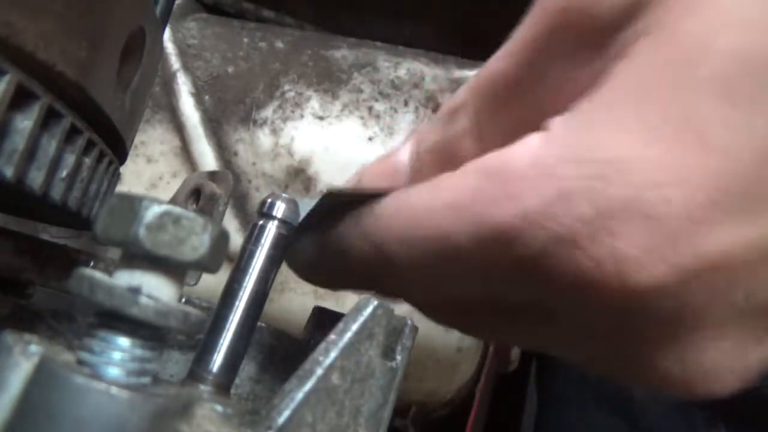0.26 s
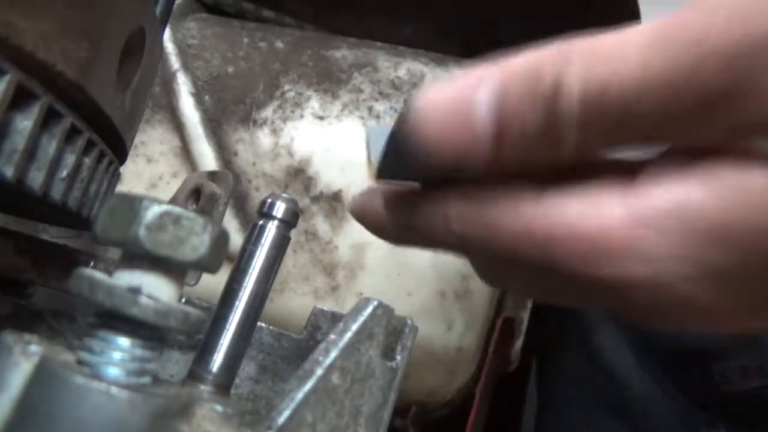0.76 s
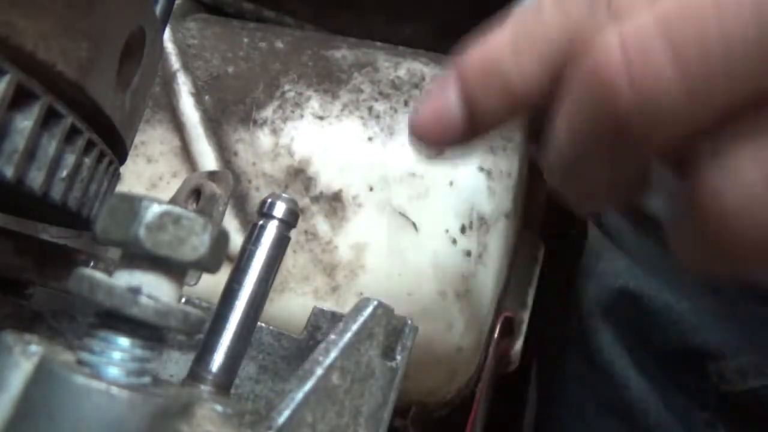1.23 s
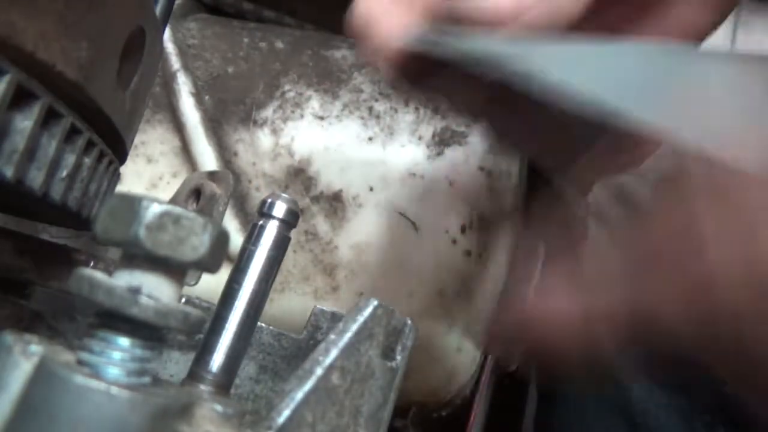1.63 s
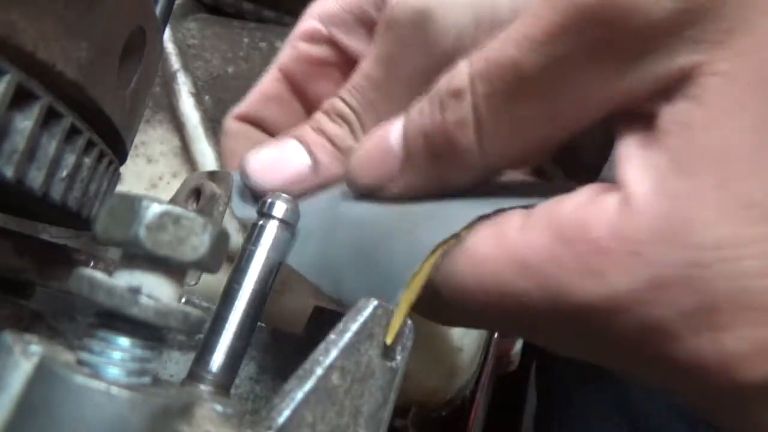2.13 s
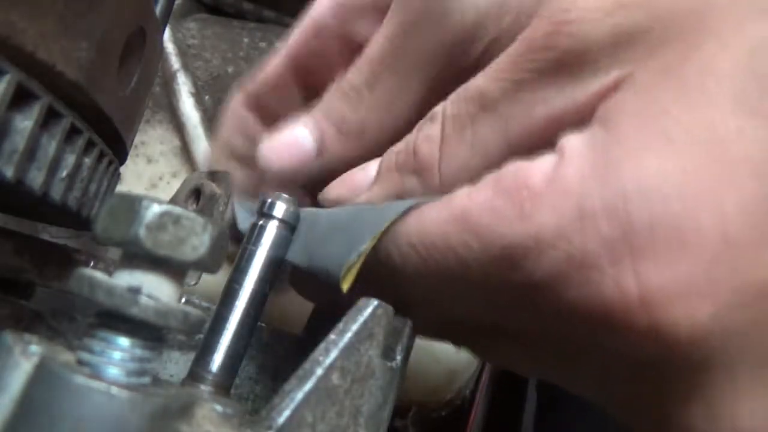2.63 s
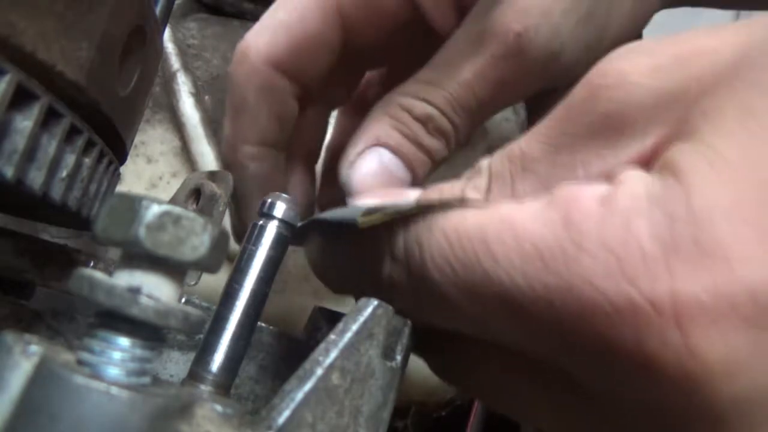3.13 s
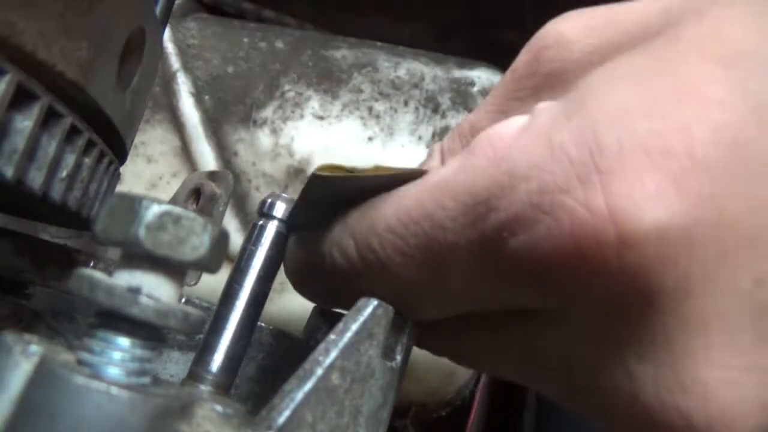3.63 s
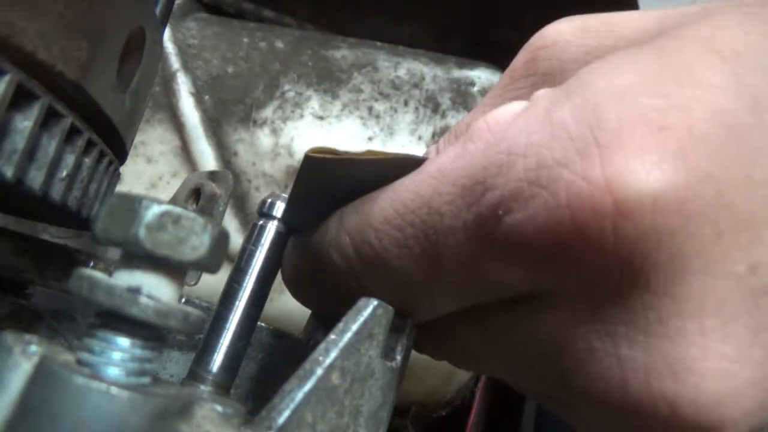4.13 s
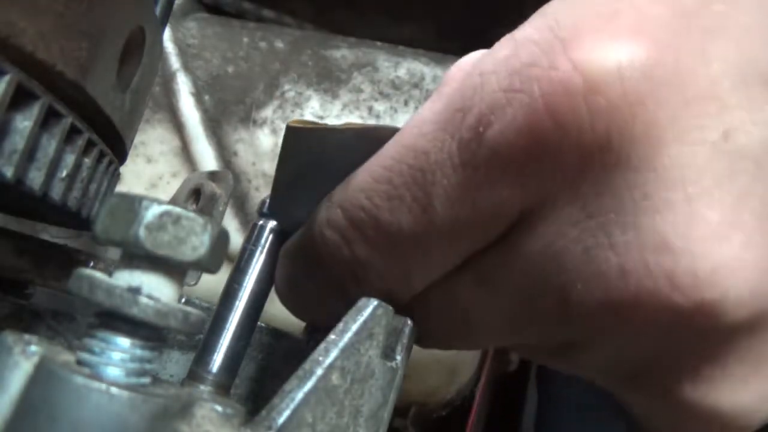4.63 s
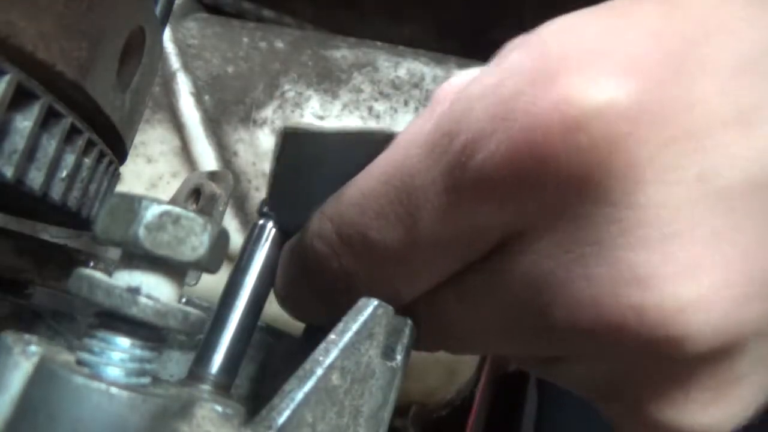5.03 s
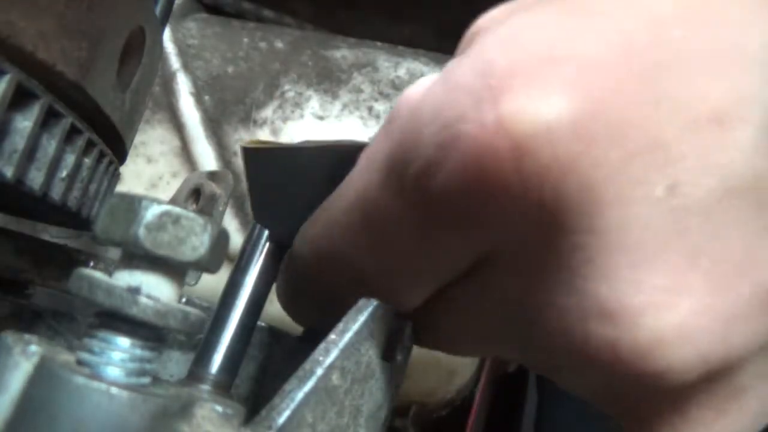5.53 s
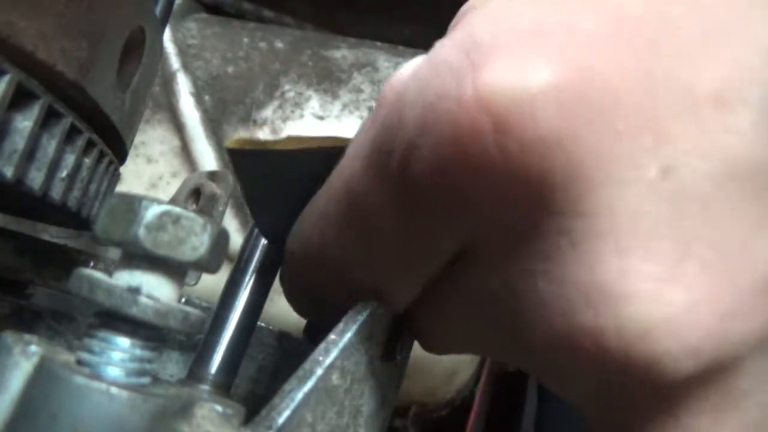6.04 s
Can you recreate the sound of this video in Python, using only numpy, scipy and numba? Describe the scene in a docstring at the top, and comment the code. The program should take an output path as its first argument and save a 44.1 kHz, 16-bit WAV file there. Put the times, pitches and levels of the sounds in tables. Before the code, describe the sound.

Close by in a quiet workshop, hands fold a strip of sandpaper and fit it around a steel shaft, making uneven hissing scrapes and crackles. Sharp taps thud in a hollow bench, and the shaft rings softly where it is rubbed. Near the end a geared motor clacks on, rattles for under a second with the paper hissing on the spinning steel, then runs down, leaving a fading metallic ring.

```python
"""Sandpaper hisses and crackles as hands fold a strip and fit it round a steel shaft, close by in a workshop.
Catching grit sounds through the paper and the fingers, taps thud in a hollow bench, and the shaft rings
where it is rubbed. Near 5 s a geared motor clacks in, spins the shaft against the paper, rattles down
and leaves a steel part ringing. Quiet room air and a faint insect lie underneath."""
import sys
import numpy as np
from scipy import signal
from scipy.fft import rfft, irfft
from scipy.io import wavfile
from scipy.ndimage import uniform_filter1d
from numba import njit

SR = 44100
rng = np.random.default_rng(int(sys.argv[2]) if len(sys.argv) > 2 else 0)


def persist_wave(psi):
    """Save psi, clipped to +-1, as 16-bit WAV."""
    counts = np.round(np.clip(psi, -1, 1) * 32767).astype(np.int16)
    wavfile.write(sys.argv[1], SR, np.atleast_2d(counts).T)


N = 276948
T = np.arange(N) / SR
FFT_SIZE = 4096
BIN_HZ = np.maximum(np.arange(FFT_SIZE // 2 + 1) * SR / FFT_SIZE, 1)
LN_1000 = np.log(1000)  # 60 dB of decay
MOTOR_ON_S, MOTOR_OFF_S = 4.957, 5.777

# grit hiss spectrum: (frequency [Hz], density [dB])
GRIT_SPECTRUM = [(3000, -20), (5500, -11), (8300, -3), (9900, -1.5), (11400, -11), (14700, -30.5)]
# hollow bench: (frequency [Hz], level [dB], t60 [s])
BENCH_MODES = [(221.4, 4, 0.15), (329, 5, 0.045), (644, 8, 0.012), (1260, 4.5, 0.026)]


def undb(db):
    """Decibels to gain."""
    return 10 ** (np.asarray(db) / 20)


def unit(x):
    """Scale to rms 1."""
    return x / np.sqrt(np.mean(x ** 2))


def walk(rate_hz):
    """Slewed random levels, spread near 1."""
    hold = int(SR / rate_hz)
    return uniform_filter1d(np.repeat(rng.standard_normal(N // hold + 1), hold), hold)[:N]


def on_bins(points):
    """Interpolate (Hz, value) points onto BIN_HZ in log frequency."""
    hz, value = np.transpose(points)
    return np.interp(np.log(BIN_HZ), np.log(hz), value)


def filtered(x, response):
    """Convolve with a response given on BIN_HZ."""
    return signal.oaconvolve(np.atleast_2d(x), np.atleast_2d(irfft(response, FFT_SIZE)), axes=1)


def colour(x, spectrum):
    """Minimum-phase filter from (Hz, dB) points; mean power gain 1."""
    cepstrum = irfft(np.log(unit(undb(on_bins(spectrum)))), FFT_SIZE)
    cepstrum[1:FFT_SIZE // 2] *= 2
    cepstrum[FFT_SIZE // 2:] = 0
    return filtered(x, np.exp(rfft(cepstrum)))[:, :N].reshape(x.shape)


def resonance(x, hz, width_hz):
    """Band-pass, gain 1 at the centre, Q at least 0.6."""
    return signal.lfilter(*signal.iirpeak(hz, max(hz / width_hz, .6), SR), x)


@njit
def glide(x, hz, relative_width):
    """State-variable band-pass with a moving centre."""
    out, band_state, low_state = np.empty(len(x)), 0., 0.
    for i in range(len(x)):
        g = np.tan(np.pi * hz[i] / SR)
        band = (band_state + g * (x[i] - low_state)) / (1 + g * (g + relative_width))
        band_state = 2 * band - band_state
        low_state += 2 * g * band
        out[i] = relative_width * band
    return out


def ring(x, modes):
    """Damped modes; white noise of rms 1 gives each its listed level."""
    out = 0
    for hz, db, t60_s in modes:
        pole = np.exp(2j * np.pi * hz / SR - LN_1000 / (t60_s * SR))
        mode = signal.lfilter([0, pole.imag], [1, -2 * pole.real, abs(pole) ** 2], x)
        out += undb(db) * np.sqrt(2 * (1 - abs(pole) ** 2)) * mode
    return out


def swells(peak_s, peak_db, rise_s, fall_s):
    """Level [dB] of the loudest event at each moment; rise and fall times span 20 dB."""
    level_db = np.full(N, -200.)
    for at, top_db, rise, fall in np.broadcast(peak_s, peak_db, rise_s, fall_s):
        level_db = np.maximum(level_db, top_db - 20 * np.maximum((at - T) / rise, (T - at) / fall))
    return level_db


def grains(spread_db, patch_db, patch_hz):
    """Dense tiny impacts: most small, a few large, in patches."""
    size = np.minimum(rng.exponential(size=N), 5)
    return unit(undb(spread_db * size + patch_db * walk(patch_hz)) * rng.standard_normal(N))


def air():
    """Workshop air, swelling a little; its treble is alike left and right."""
    # (frequency [Hz], density [dB])
    air_spectrum = [(30, -18), (260, 7), (700, 8), (1500, 2), (3200, 0), (4500, -6), (10000, 0.5),
                    (15000, -20.5)]
    mid, side = colour(rng.standard_normal((2, N)), air_spectrum) * undb(5.2 * walk(5.83))
    side = 0.95 * resonance(side, 1700, 3000)
    return undb(-61) * np.array([mid + side, mid - side])


def insect(pitch_hz=3300, pulse_hz=26):
    """Faint chirr: pulses of narrow-band noise."""
    pulses = np.maximum(np.sin(2 * np.pi * pulse_hz * T), 0) ** 6
    gain = undb(-59 - walk(3) ** 2)
    return gain * pulses * unit(resonance(rng.standard_normal(N), pitch_hz, 290))


def stroke_level_db(pause_db=-17, edge_s=0.0023):
    """Hand strokes on the strip, hushed while it is held still."""
    # (peak time [s], level [dB], 20 dB rise [s], 20 dB fall [s])
    strokes = [(0.066, -51, 0.22, 0.028), (0.37, -32.5, 0.12, 0.045), (0.5, -35.5, 0.16, 0.07),
               (0.785, -39, 0.13, 0.087), (0.828, -35.5, .02, 0.075), (0.912, -43.5, 0.16, 0.26),
               (1.064, -48.5, 0.1, 0.25), (1.2, -44, 0.043, 0.094), (1.312, -52, .012, 0.71),
               (1.446, -33.5, 0.011, 0.02), (1.544, -31, 0.12, 0.12), (1.76, -34.5, 0.16, 0.31),
               (1.825, -34, 0.091, .075), (1.881, -28, 0.002, 0.13), (1.973, -36, 0.026, 0.026),
               (2.147, -35.5, 0.29, 0.38), (2.26, -43.5, 0.13, 0.044), (2.458, -28, 0.035, 0.04),
               (2.609, -35.5, 0.16, 0.21), (2.799, -26.5, 0.11, 0.036), (2.865, -32, 0.016, 0.029),
               (2.916, -35, 0.033, 0.41), (3.062, -23.5, 0.18, 0.063), (3.136, -31, 0.009, 0.015),
               (3.185, -30.5, 0.011, 0.091), (3.214, -23, 0.055, 0.14), (3.28, -31, .05, 0.21),
               (3.358, -33.5, 0.054, .041), (3.45, -43.5, 0.058, 0.22), (3.85, -32, 0.0051, 0.085),
               (4.148, -53.5, 0.084, 0.069), (4.231, -41.5, 0.025, 0.033), (4.349, -45.5, 0.02, 0.02),
               (4.445, -46, 0.082, 0.17)]
    # strip held still: (start [s], length [s])
    pauses = [(0.077, 0.11), (0.567, 0.1), (1.121, 0.034), (1.255, 0.052), (1.623, 0.072), (1.941, 0.016),
              (1.993, 0.023), (3.087, 0.026), (3.152, 0.017), (3.477, 0.049)]
    still = sum((T > start_s) & (T < start_s + length_s) for start_s, length_s in pauses)
    return swells(*np.transpose(strokes)) + pause_db * uniform_filter1d(1. * still, int(edge_s * SR))


def flex_hz(paper_hz, rate_hz):
    """Pitch of a patch of the sheet, jumping each time the bend changes."""
    hold = int(SR / rate_hz)
    jumps = np.repeat(rng.standard_normal(N // hold + 1), hold)[:N]
    return np.clip(1.3 * paper_hz * undb(4 * jumps), 1500, 12000)


def sandpaper(whistle_hz=9470):
    """Catching grit sounds as hiss, through the bending paper and through the fingers."""
    # grip, for a -40 dB stroke: (time [s], paper level [dB], paper pitch [Hz], finger rumble [dB])
    grip = [(0, -43.5, 5700, -86), (.75, -42.5, 3840, -58.5), (1.0, -37, 3130, -42.5),
            (1.2, -35.5, 4200, -49.5), (1.55, -41.5, 4700, -51.5), (1.85, -52, 5370, -79),
            (2.1, -35.5, 5320, -47.5), (3.0, -49, 4800, -52), (3.3, -51, 4430, -55.5),
            (3.9, -30, 2480, -35.5), (4.23, -31.5, 1880, -48.5), (4.76, -43.5, 3220, -42)]
    # (frequency [Hz], density [dB])
    finger_spectrum = [(100, -20), (450, 3.5), (1100, 5), (1900, 16.5), (3000, -27)]
    time_s, *columns = np.transpose(grip)
    paper_db, paper_hz, finger_db = (np.interp(T, time_s, column) for column in columns)
    paper_db[T > time_s[-1]] = -200
    stroke_db = stroke_level_db()
    effort_db = stroke_db + 40
    catches = grains(spread_db=3, patch_db=2.5, patch_hz=90)
    patches = sum(glide(catches, flex_hz(paper_hz, rate_hz), 0.08) for rate_hz in (12, 25))
    paper = undb(paper_db + 0.83 * effort_db) * unit(glide(catches, paper_hz, 0.95) + 1.55 * patches)
    # fast grit on the taut strip: hard strokes gather into one bright band
    bright_band = unit(glide(catches, whistle_hz * undb(.5 * walk(27.48)), 0.13))
    whistle = undb(-10.5 + 1.29 * effort_db) * bright_band
    hiss = undb(stroke_db - 6) * (colour(catches, GRIT_SPECTRUM) + whistle)
    rumble = colour(undb(finger_db + 0.72 * effort_db) * catches, finger_spectrum)
    bench_boom = 2.1 * resonance(rumble, BENCH_MODES[0][0], 21)
    return hiss + paper + rumble + bench_boom


def taps():
    """Snaps, taps and the motor's clack: a sharp pitched crack with the bench ringing under it."""
    # (time [s], crack peak [dB], crack pitch [Hz], thud re crack [dB], thud pitch [Hz], crack t60 [s])
    hits = [(0.8032, -20.5, 2390, -10.5, 400, 0.011), (1.707, -24, 4730, -13.5, 453, 0.012),
            (1.7265, -18.5, 3830, -16, 300, 0.014), (1.8782, -19, 5500, -18, 400, 0.011),
            (1.9752, -28.5, 3000, -10, 400, 0.0092), (2.0173, -24.5, 3080, -33, 500, 0.013),
            (2.0248, -24.5, 3020, -31, 500, 0.016), (2.053, -23, 5200, -11, 900, 0.038),
            (2.3263, -16, 1950, -16, 656, 0.11), (2.6926, -20, 3330, -12.5, 710, 0.12),
            (3.0485, -15, 1330, -11.5, 720, 0.014), (3.4108, -7.5, 5060, -15, 1020, 0.016),
            (3.532, -24, 8000, -17.5, 750, 0.045), (3.8415, -13.5, 2300, -4, 586, 0.21),
            (3.86, -8.5, 1420, -19, 1200, 0.095), (4.7715, -20.5, 8440, -4.5, 400, 0.053),
            (4.959, -2, 2040, -8.5, 720, 0.068)]
    out, t = np.zeros(N + SR), T[:SR // 4]
    noises = rng.standard_normal((len(hits), len(t)))
    noises[:, 0] = 4  # first contact is hardest
    # each landing spot detunes and weights the modes: (fraction, dB)
    spots = rng.standard_normal((len(hits), len(BENCH_MODES), 2)) * [.08, 3]
    for (time_s, peak_db, crack_hz, thud_db, thud_hz, t60_s), noise, spot in zip(hits, noises, spots):
        decay = LN_1000 * t / max(t60_s, .01)
        burst = resonance(noise * np.exp(-decay), crack_hz, 2.5 * crack_hz)
        snap = resonance(noise * np.exp(-t / 0.0019), 3000, 3400)
        crack = resonance(burst, crack_hz, 0.32 * crack_hz) + 0.5 * snap
        modes = [(hz * (1 + detune), db + weight_db, ring_s)
                 for (hz, db, ring_s), (detune, weight_db) in zip(BENCH_MODES, spot)]
        force = np.diff(noise * np.exp(-decay / 1.99), prepend=0)
        thud = resonance(ring(force, modes), thud_hz, thud_hz)
        hit = crack / abs(crack).max() + undb(thud_db) * thud / abs(thud).max()
        start = int(time_s * SR)
        out[start:start + len(t)] += undb(peak_db) * hit
    return out[:N]


def rubbed_shaft():
    """Dragged grit pumps the shaft's modes, which sing on; where it catches decides which speak."""
    # grit catching: (peak time [s], upper-mode drive [dB], lower-mode drive [dB])
    drags = [(2.225, -39, -51.5), (2.337, -34, -46), (2.479, -51, -39.5), (2.755, -37.5, -46),
             (3.034, -40.5, -45.5), (3.302, -30.5, -44.5)]
    # (frequency [Hz], level [dB], t60 [s])
    shaft_modes = [(586.3, -1, 0.5), (625, -2, 0.48), (1709, 0, 0.9), (2375, -17, 0.5)]
    peak_s, upper_db, lower_db = np.transpose(drags)
    grit = grains(spread_db=5, patch_db=-1, patch_hz=35)
    out = 0
    for drag_db, modes in ((lower_db, shaft_modes[:2]), (upper_db, shaft_modes[2:])):
        drag = undb(swells(peak_s, drag_db, rise_s=0.094, fall_s=0.078)) * grit
        for hz, db, t60_s in modes:
            retain = np.exp(-2 * LN_1000 / (t60_s * SR))
            energy = signal.lfilter([1 - retain], [1, -retain], drag ** 2)
            amplitude = undb(db + 2 * walk(30)) * np.sqrt(2 * energy)
            out += amplitude * np.sin(2 * np.pi * hz * T + walk(20))
        out += ring(drag, modes)  # single grains roughen the ring
    return .5 * out


def shaft_speed_hz(start_hz=88, full_hz=118, creep_hz=55.5, spin_up_s=.1, brake_s=0.097, creep_s=1):
    """Turn rate: spins up, drops fast at switch-off, then creeps down."""
    running_s = np.maximum(T - MOTOR_ON_S, 0)
    slowing_s = np.maximum(T - MOTOR_OFF_S + .06, 0)  # slows just before the level falls
    driven_hz = full_hz - (full_hz - start_hz) * np.exp(-running_s / spin_up_s)
    braking_hz = (driven_hz - creep_hz) * np.exp(-(slowing_s / brake_s) ** 2)
    return braking_hz + creep_hz * np.exp(-slowing_s / creep_s)


def steel_ring(rattle_db, hz=770.5, t60_s=2.2, initial_db=-62):
    """The drive's longest mode: faint at first, it builds and wavers under the rattle, then dies slowly."""
    retain = np.exp(-LN_1000 / (t60_s * SR))
    amplitude, _ = signal.lfilter([1 - retain], [1, -retain], undb(rattle_db - 7), zi=[undb(initial_db)])
    driven = np.clip(undb(rattle_db + 24), 0, 1)
    drift_rad = np.cumsum(driven * walk(12)) * 30 / SR
    return amplitude * undb(2.5 * driven * walk(13)) * np.sin(2 * np.pi * hz * T + drift_rad)


def gear_whine(full_hz=2450, fall_hz_per_s=4500, silent_hz=500):
    """The gear mesh sings faintly, then sinks and fades once power is cut."""
    hz = np.maximum(full_hz - fall_hz_per_s * np.maximum(T - MOTOR_OFF_S, 0), 1)
    fade = np.clip(hz / silent_hz - 1, 0, 1)
    return undb(-40) * (T > MOTOR_ON_S) * fade * unit(glide(rng.standard_normal(N), hz, .05))


def motor():
    """Gear teeth rattle, harder once a turn and lumpier as the shaft slows; paper hisses on the steel."""
    # (frequency [Hz], density [dB])
    gear_spectrum = [(120, -33.5), (280, -11), (400, -14), (670, 2.5), (1010, -6), (1650, -6), (2340, -5.5),
                     (3220, -11), (4500, -10), (7000, -39)]
    # paper on the spinning shaft: (frequency [Hz], density [dB])
    sanding_spectrum = [(3300, -37), (4500, 2.5), (6500, 0), (7600, -5), (9300, 1.5), (11000, -8.5),
                        (14800, -23)]
    # steel of the drive: (frequency [Hz], level [dB], t60 [s])
    drive_modes = [(667, -10.5, 0.27), (947, -35, 0.3), (1220, -17.5, 0.3), (1725, -10, 0.12),
                   (1860, -24, 0.26), (2337, -22, 0.21), (3620, -25, 0.1), (4550, -20.5, 0.06),
                   (5280, -19, 0.065), (5700, -31, .15), (6370, -16, 0.063), (6830, -18, 0.14)]
    coast_s = np.maximum(T - MOTOR_OFF_S, 0)
    gate_db = np.clip(1000 * (T - MOTOR_ON_S - .02), -200, 0)  # catches just after the clack
    rattle_db = gate_db - 19.5 - 29 * coast_s - 79 * coast_s ** 2
    hiss_db = gate_db + np.maximum(-22 - 43 * coast_s, -38.5)
    turn_hz = shaft_speed_hz()
    turns = np.cumsum(turn_hz * (1 + 0.014 * walk(30))) / SR
    speed = turn_hz / turn_hz.max()
    beat = (1.1 - 0.47 * speed) * (np.exp(-(turns % 1) / 0.091) - .3)
    teeth = undb(rattle_db) * (1 + 1.13 * beat) * grains(spread_db=2.5, patch_db=1.5, patch_hz=60)
    rattle = colour(teeth, gear_spectrum) + ring(teeth, drive_modes)
    hiss = undb(hiss_db) * (1 + 0.74 * beat) * grains(spread_db=3, patch_db=1.5, patch_hz=39)
    # at speed the steel colours the hiss; near rest bright grit takes over
    sanding = colour(speed * hiss, sanding_spectrum) + colour((1 - speed) * hiss, GRIT_SPECTRUM)
    unbalance_hum = undb(rattle_db - 31) * speed ** 6 * np.sin(2 * np.pi * turns)
    return rattle + steel_ring(rattle_db) + sanding + unbalance_hum + gear_whine()


def mic_ports(x, balance_db, lead_rad):
    """One source as it reaches the left and right microphone ports."""
    left = undb(on_bins(balance_db) / 2) * np.exp(.5j * on_bins(lead_rad))
    centring = (-1) ** np.arange(len(BIN_HZ))  # half-window delay
    return filtered(x, centring * np.array([left, 1 / left]))[:, FFT_SIZE // 2:FFT_SIZE // 2 + N]


def room(x, t60_s=0.089, level_db=-15):
    """Short dull tail, different at each port."""
    t = T[:SR // 4]
    tail = rng.standard_normal((2, len(t))) * np.exp(-LN_1000 * t / t60_s) * (t > .003)
    tail = signal.lfilter(*signal.butter(2, [150, 7100], "band", fs=SR), tail)
    tail /= np.sqrt(np.sum(tail[0] ** 2))
    return undb(level_db) * signal.oaconvolve(x[None], tail, axes=1)[:, :N]


def scene():
    """Hands straight ahead, motor a little to the left."""
    # port balance: (frequency [Hz], left minus right [dB])
    hands_balance = [(200, 0.19), (11000, 0.034)]
    motor_balance = [(200, -1.5), (600, 5), (5000, 4), (9000, -0.5)]
    # port phase: (frequency [Hz], left lead [rad])
    hands_lead = [(200, -0.11), (11000, -0.22)]
    motor_lead = [(200, -0.035), (900, -0.6), (6000, -0.71), (10000, -0.11)]
    hands = sandpaper() + taps() + rubbed_shaft()
    drive = motor()
    direct = mic_ports(hands, hands_balance, hands_lead) + mic_ports(drive, motor_balance, motor_lead)
    return direct + room(hands + drive) + air() + insect()


def record(dry, low_hz=152, top_hz=15900):
    """Small microphones: thin bass, self-noise, steep top cut."""
    thin = signal.sosfilt(signal.butter(2, low_hz, "high", fs=SR, output="sos"), dry)
    hiss = undb(-69) * rng.standard_normal(N)
    return signal.sosfilt(signal.ellip(10, .2, 100, top_hz, fs=SR, output="sos"), thin + hiss)


dry = scene()
out = record(dry)
persist_wave(out)
```